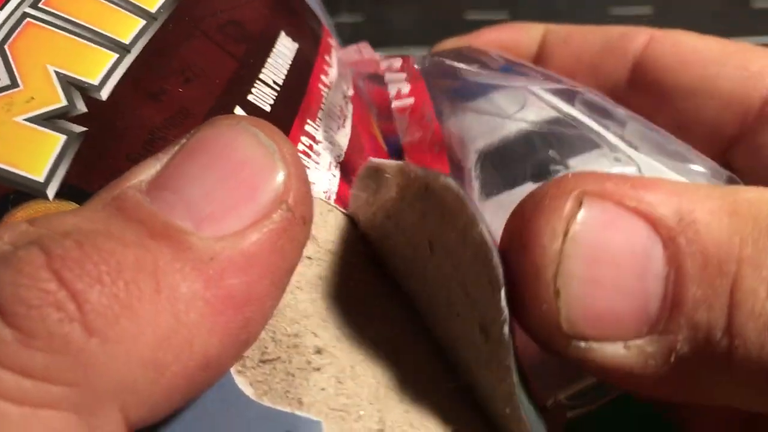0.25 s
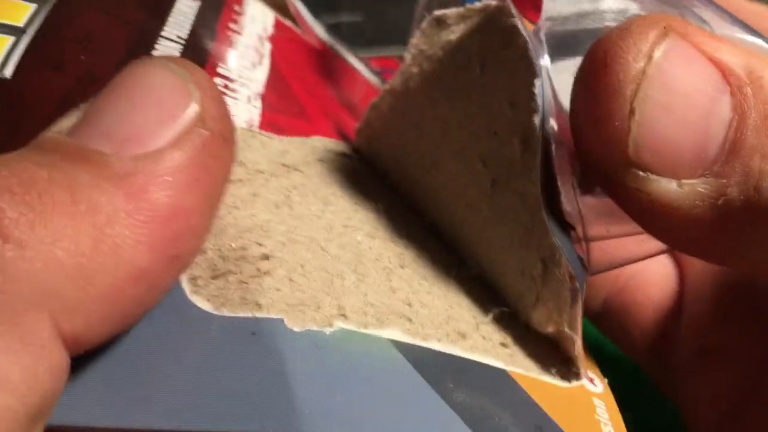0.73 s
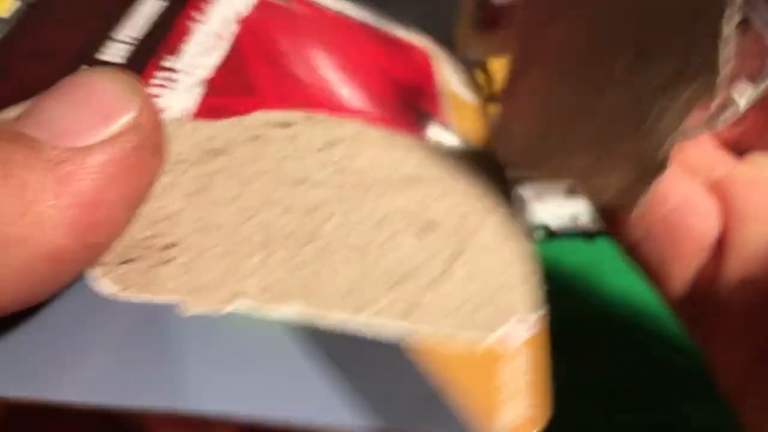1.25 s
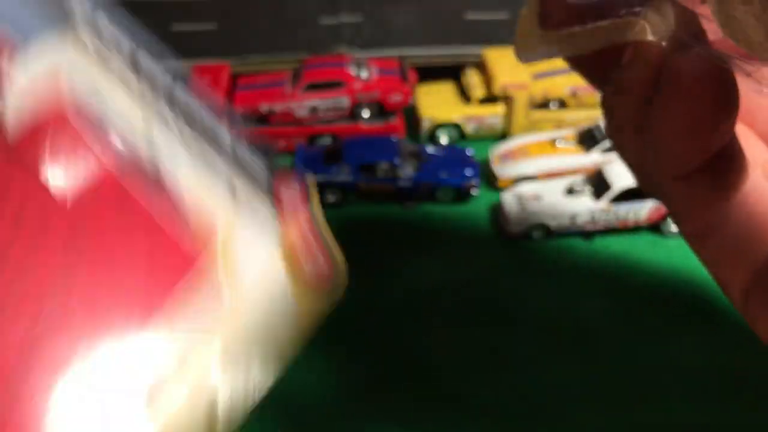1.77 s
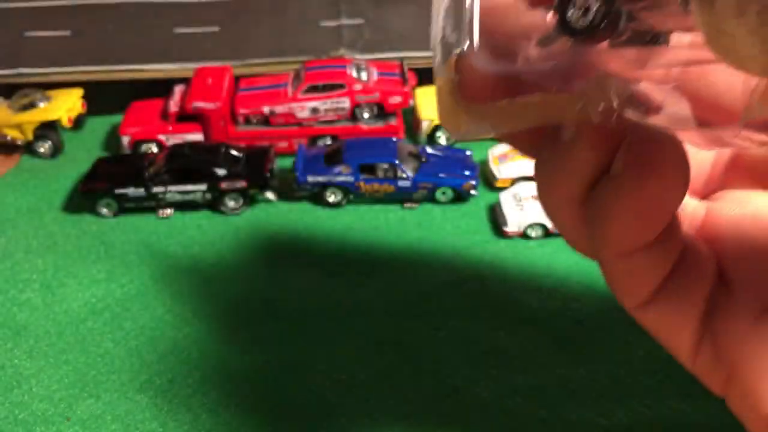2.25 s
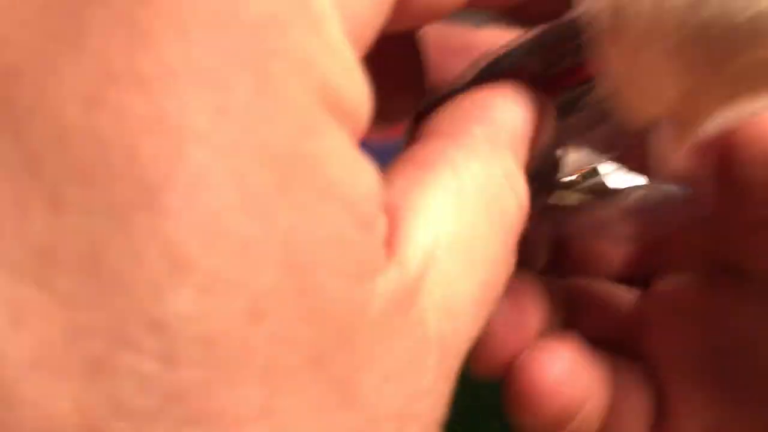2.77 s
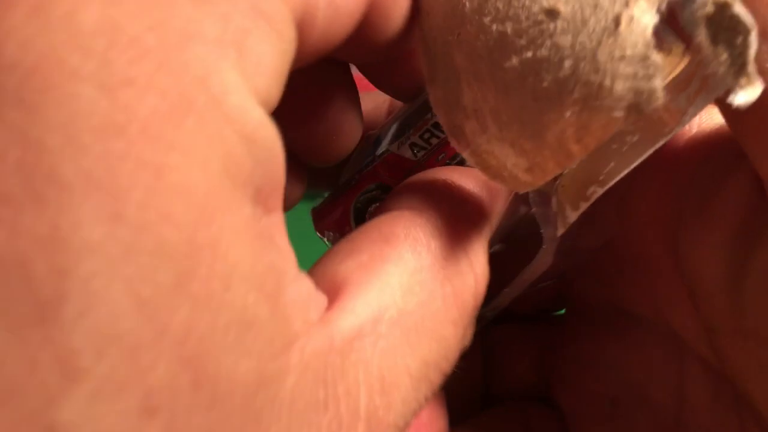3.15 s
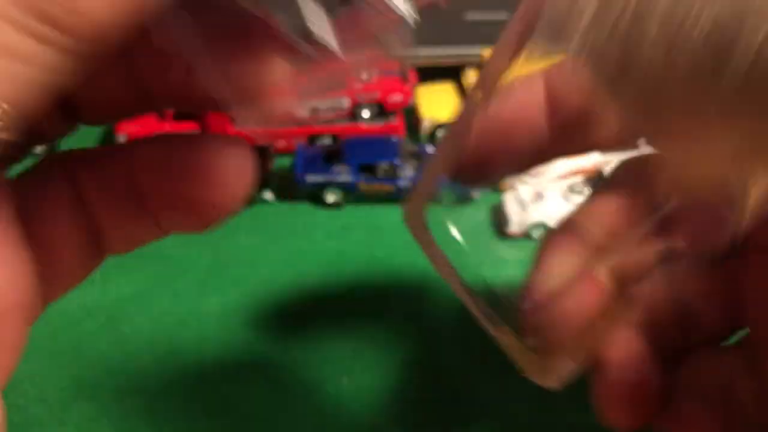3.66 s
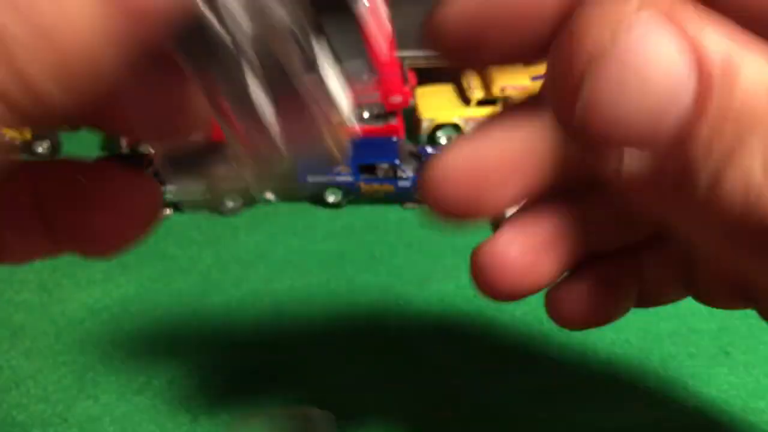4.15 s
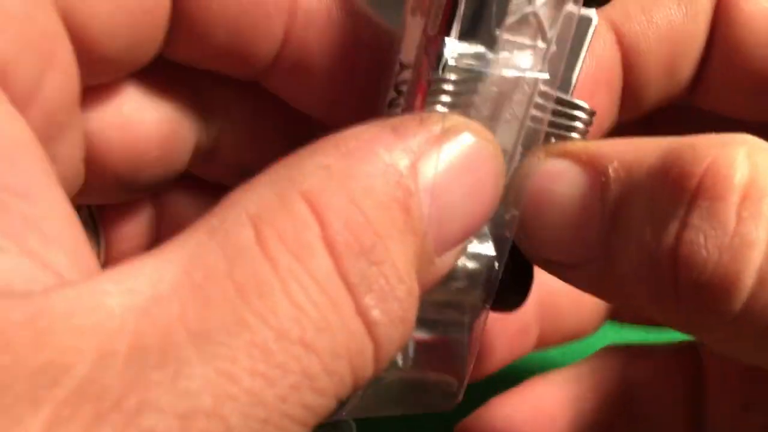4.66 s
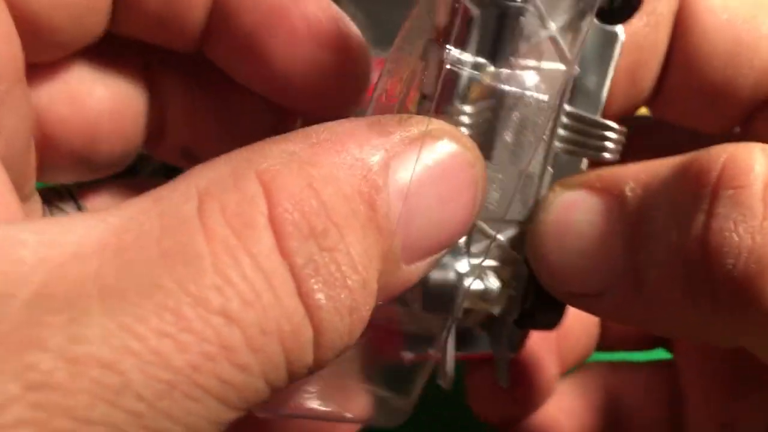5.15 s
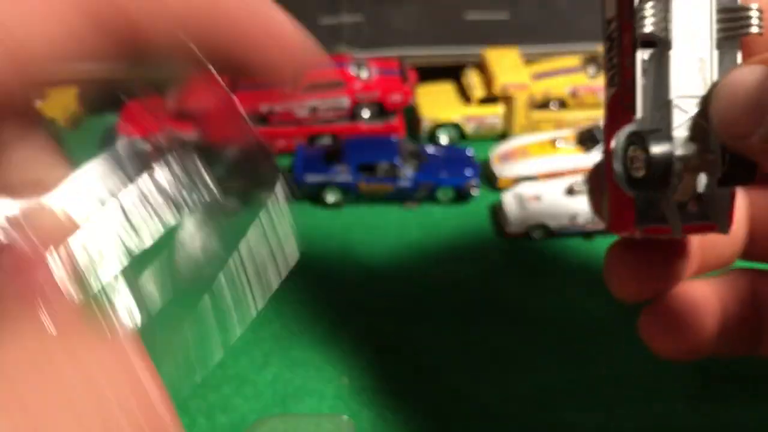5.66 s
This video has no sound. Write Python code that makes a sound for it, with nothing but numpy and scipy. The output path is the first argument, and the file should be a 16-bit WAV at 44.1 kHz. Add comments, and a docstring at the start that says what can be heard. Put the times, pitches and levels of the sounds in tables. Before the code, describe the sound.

Cardboard fibres rip in rough, hissy bursts, mixed with hard plastic cracks and dull thumps from the fingers. The tearing stops and light irregular crinkling continues, then the empty shell buckles sharply with brief squeaks. After that come sparse ticks, a strong click with a low knock, and a last cluster of snaps. Dry, mono, close phone pickup, short room reflection, faint air hiss.

```python
"""A clear plastic blister is torn off its cardboard card close to a phone; then shell and toy are handled.
Buckling plastic: short noise bursts ring panel modes. Tearing fibres and finger rub: noise gated by random
breaks, plus tiny damped cycles. Pushes: low damped sines. Dragging fingers: narrow gliding tones.
A small room answers with decaying noise over faint air noise.
"""
import sys
import numpy as np
from scipy import signal
from scipy.fft import rfft, irfft, next_fast_len
from scipy.io import wavfile
from scipy.ndimage import uniform_filter1d

SR = 44100
rng = np.random.default_rng(int(sys.argv[2]) if len(sys.argv) > 2 else 0)


def to_wav(s):
    """Save 16-bit WAV."""
    ch = np.atleast_2d(s).T  # columns
    pcm = np.round(np.clip(ch, -1, 1) * 32767)  # PCM
    wavfile.write(sys.argv[1], SR, pcm.astype(np.int16))


N = 260340
SPAN = 4096  # samples: filter padding and unit of event lengths


def amp(db):
    """Amplitude factor of a level in dB."""
    return 10 ** (np.asarray(db) / 20)


def unit(x):
    """Scale to RMS 1."""
    return x / np.sqrt(np.mean(x ** 2, axis=-1, keepdims=True) + 1e-20)


def along(points, hz):
    """Interpolate (Hz, value) points on a log frequency axis."""
    point_hz, value = np.transpose(points)
    return np.interp(np.log(hz + 1), np.log(point_hz + 1), value)


def filtered(x, response):
    """Multiply the spectrum of x by a complex response of frequency."""
    size = next_fast_len(x.shape[-1] + SPAN)
    spectrum = rfft(x, size) * response(np.fft.rfftfreq(size, 1 / SR))
    return irfft(spectrum, size)[..., :x.shape[-1]]


def colour(points):
    """Response through (Hz, dB) points."""
    return lambda hz: amp(along(points, hz))


def mode(hz, centre_hz, width_hz):
    """Resonance of one damped mode, 1 at its centre."""
    return 1j * hz * width_hz / (centre_hz ** 2 - hz ** 2 + 1j * hz * width_hz)


def place(rows, start_s):
    """Sum short sounds, each from its own start."""
    at = np.round(start_s * SR).astype(int)[:, None] + np.arange(rows.shape[1])
    return np.bincount(at.ravel(), rows.ravel(), N)[:N]


# blister and card modes: centre_hz [Hz], width_hz [Hz], level_db [dB]
SHELL = [(624, 134, -5.5), (997, 350, -4), (1450, 220, -6.5), (1756, 89, -3.5), (2318, 480, -8),
         (3490, 1050, -14)]


def shell(hz):
    """Fixed modes of blister and card, summed with alternating sign."""
    modes = [amp(level_db) * mode(hz, centre_hz, width_hz) for centre_hz, width_hz, level_db in SHELL]
    return sum((-1) ** k * m for k, m in enumerate(modes))


# tugs that rip fibres and finger strokes: peak_s [s], rise_ms [ms], fall_ms [ms, before the shares below],
# card rustle_db [dB], fibre hiss_db [dB], bent panel_hz [Hz]
TUGS = [(.13, 27, 53, -54, -26.5, 1200), (0.186, 13, 58, -43, -21, 2400), (.215, 27, 79, -44, -30.5, 2440),
        (.317, 40, 85, -33, -27, 1070), (.418, 3.7, 34, -19.5, -24, 880), (0.439, 16, 25, -38, -19, 900),
        (.487, 12, 33, -21.5, -19, 780), (0.58, 15, 48, -23.5, -28.5, 824),
        (.625, 16, 57, -32.5, -35, 1150), (.89, 41, 120, -41.5, -35.5, 2540),
        (0.996, 26, 50, -57, -21, 1900), (1.055, 24.6, 40, -19, -23, 970), (1.201, 17, 23, -25, -33, 2110),
        (1.271, 32, 66, -58, -25, 2740), (1.37, 43, 91, -23.5, -39, 860), (1.55, 15, 120, -46.5, -47, 1840),
        (1.864, 13, 100, -32, -45, 1420), (2.067, 11, 97, -36.5, -62, 990),
        (2.189, 13, 67, -38.5, -41.5, 1460), (2.273, 9.3, 80, -37.5, -70, 1560),
        (2.405, 28, 42, -44, -65, 1720), (2.662, 6.2, 22, -34.5, -69, 1500),
        (2.711, 7.7, 21, -36.5, -71, 1590), (2.791, 2, 21, -28, -43, 1510),
        (2.891, 52, 68, -32, -40.5, 3150), (3.051, 10, 110, -35.5, -39, 2220),
        (3.185, 47, 75, -31.5, -46, 1190), (3.3, 7.4, 42, -23, -22, 1130), (3.35, 16, 11, -29, -16, 1080),
        (3.405, 32, 46, -47, -34.5, 2900), (3.455, 37, 8.7, -45, -25.5, 1496),
        (3.558, 5, 33, -32, -66, 1420), (3.628, 7.7, 31, -25.5, -50.5, 1740),
        (4.006, 3, 45, -49.5, -54, 1400), (4.051, 6.2, 12, -42, -40, 1300), (4.08, 10, 83, -46, -55, 1380),
        (4.328, 3.6, 56, -48, -51, 2590), (4.373, 20, 58, -45, -48, 2520),
        (4.518, 2.6, 12, -12.5, -50, 1770), (4.687, 5.5, 24, -44, -59, 3070),
        (4.731, 8.9, 23, -51, -41, 1720), (5.003, 99, 97, -49.5, -45, 2740),
        (5.322, 8.8, 40, -38, -42, 3270), (5.383, 8.3, 27, -23.5, -64, 1260),
        (5.562, 11, 35, -39, -50, 1000), (5.807, 38, 52, -42.5, -47, 2720),
        (5.891, 4.2, 43, -19, -42, 1400)]
# hands holding the pack: time_s [s], card rustle_db [dB], handling rumble_db [dB]
HOLD = [(0, -37, -53), (.4, -54.5, -56), (.73, -49, -63), (1.3, -55, -54.5), (1.63, -55.5, -59.5),
        (1.84, -39.5, -38), (2.03, -47.5, -54), (2.27, -62, -48), (2.6, -55.5, -60.5), (2.72, -89, -50),
        (3.02, -62, -63), (3.29, -49, -51), (3.5, -39, -50), (3.68, -56, -62), (3.87, -63, -65),
        (4.02, -58.5, -63), (4.18, -75, -63), (4.38, -53.5, -55.5), (4.62, -55, -58.5), (4.9, -63, -62.5),
        (5.28, -53.5, -59.5), (5.5, -58.5, -60), (5.68, -52.5, -61), (5.81, -64, -54.5), (5.9, -67, -50)]
RUSTLE_FALL, HISS_FALL = 0.5, 0.66  # shares of fall_ms
RASP_DULL, RASP_DB = 0.31, -2.5  # place between hiss (0) and rustle (1), offset
HOLD_HISS_DB, TUG_RUMBLE_DB = -5.5, -23  # relative to the rustle of hold and tug


def effort():
    """Levels of rumble, rustle, rasp, hiss in dB: each tug swells and dies over the hold."""
    peak_s, rise_ms, fall_ms, rustle_db, hiss_db, _ = np.transpose(TUGS)[:, :, None]
    t = np.arange(0, N / SR + .002, .001)

    def swell(db, fade_ms):
        rise = (t - peak_s) * 1000 / rise_ms
        fade = (peak_s - t) * 1000 / fade_ms
        return np.sum(amp(db) * np.exp(np.minimum(rise, fade)), axis=0)

    time_s, hold_db, grip_db = np.transpose(HOLD)
    hold = amp(np.interp(t, time_s, hold_db))
    tug = swell(rustle_db, RUSTLE_FALL * fall_ms)
    rumble = amp(np.interp(t, time_s, grip_db)) + amp(TUG_RUMBLE_DB) * tug
    hiss = amp(HOLD_HISS_DB) * hold + swell(hiss_db, HISS_FALL * fall_ms)
    levels = [20 * np.log10(v) for v in (rumble, hold + tug, hiss)]
    rumble_db, rustle_db, hiss_db = [np.interp(np.arange(N) / SR, t, db) for db in levels]
    rasp_db = RASP_DULL * rustle_db + (1 - RASP_DULL) * hiss_db + RASP_DB
    return rumble_db, rustle_db, rasp_db, hiss_db


def grains(rate_hz, spread_db, decay_ms, steady):
    """Gate of many small random breaks of very unequal size, over a steady share."""
    happens = rng.random(N) < rate_hz / SR
    size = amp(spread_db * np.minimum(rng.exponential(size=N), 3))
    decay = np.exp(-np.arange(SPAN // 4) / (decay_ms * SR / 1000))
    return steady + unit(signal.fftconvolve(happens * size, decay)[:N])


def bending(x, peak_s, panel_hz):
    """Shell modes plus the panel bent now; one panel fades into the next."""
    hz, t, z = signal.stft(x, SR, nperseg=512)
    panels = np.abs(mode(hz[:, None], panel_hz, 0.04 * panel_hz + 120))
    bent = np.array([np.interp(t, peak_s, row) for row in panels])
    body = .5 * np.abs(shell(hz))[:, None] + 0.2 * bent
    return signal.istft(z * body / np.linalg.norm(body, axis=0), SR, nperseg=512)[1][:N]


def crackle(count):
    """Single fibres break: each a few damped cycles at its own pitch, sizes very unequal."""
    when, pitch, life, size = rng.random((count, 4)).T[:, :, None]
    hz = 1700 * amp(18 * pitch)
    t = np.arange(SPAN // 32) / SR
    level = amp(5.5 * np.minimum(-np.log(size), 3.5))
    fade = np.exp(-t * hz / (.8 + 2 * life))
    return unit(place(level * fade * np.sin(2 * np.pi * hz * t), when[:, 0] * N / SR))


# handling rumble colour: freq_hz [Hz], level_db [dB]
RUMBLE = [(20, -40.5), (50, -1), (90, -9), (200, -6), (400, -8), (800, -35)]
# rasp and snap crack colour: freq_hz [Hz], level_db [dB]
CRACK = [(2200, -9.5), (3400, -1.5), (4500, 1.5), (6200, 3.5), (8000, -1), (12000, -6.5)]
# hiss and snap sizzle colour: freq_hz [Hz], level_db [dB]
SIZZLE = [(4000, -63), (8000, -5.5), (13000, -5), (15500, -8.5), (17000, -5)]


def tearing():
    """Fibres part and fingers slide: bands of gated noise; all but the rumble share some breaks."""
    peak_s, *_, panel_hz = np.transpose(TUGS)
    rumble_db, rustle_db, rasp_db, hiss_db = effort()
    noise = rng.standard_normal((4, N))
    shared = grains(rate_hz=400, spread_db=2.5, decay_ms=3.3, steady=0.21)

    def gate(decay_ms):
        return shared + 0.25 * grains(rate_hz=440, spread_db=8.0, decay_ms=decay_ms, steady=0.22)

    slow_gate = grains(rate_hz=50, spread_db=3.5, decay_ms=7, steady=.9)
    rumble = amp(rumble_db) * unit(filtered(noise[0] * slow_gate, colour(RUMBLE)))
    rustle = amp(rustle_db) * unit(bending(noise[1] * gate(1.0), peak_s, panel_hz))
    rasp = amp(rasp_db) * unit(filtered(noise[2] * gate(1.0), colour(CRACK)))
    hiss = amp(hiss_db) * unit(filtered(noise[3] * gate(0.91), colour(SIZZLE)))
    fibres = amp((rasp_db + hiss_db) / 2 - 12.0) * crackle(count=7000)
    return fibres + rumble + rustle + rasp + hiss


# still room air colour: freq_hz [Hz], level_db [dB]
AIR = [(18, -38), (30, -3.5), (112, -8.5), (157, -30), (1760, -28), (4910, -18), (12600, -21.5),
       (14000, -15), (16000, -25.5)]


def still_air():
    """Faint steady coloured noise of the still room."""
    return amp(-64.5) * unit(filtered(rng.standard_normal(N), colour(AIR)))


# room decay: freq_hz [Hz], t60_s [s]
ROOM = [(200, 0.18), (1500, 0.24), (5000, 0.17), (14000, 0.1)]


def room(x):
    """Noise tail, each frequency dying at its own speed, after a 200-sample delay."""
    hz, t, z = signal.stft(rng.standard_normal(SR // 3), SR, nperseg=256)
    fade = amp(-60 * t / along(ROOM, hz)[:, None])
    tail = signal.istft(z * fade, SR, nperseg=256)[1]
    return signal.fftconvolve(np.pad(x, (200, 0)), tail / np.linalg.norm(tail))[:N]


SLIPS, TICKS = 14, 110  # counts
# a seam lets go in a quick, nearly even run of slips
SLIP_S, SLIP_GAP_S, SLIP_JITTER_S = 3.0625, .00553, .0005
SLIP_MS, SLIP_HZ, SLIP_DB = 1.6, 1300, (-32.5, -37, -28)  # dB: ring, crack, sizzle
TICK_DB, TICK_SCATTER_DB = (0.5, 2.5, 3.5), 5  # ring over rustle, crack over rasp, sizzle over hiss


def small_snaps():
    """Rows in SNAPS columns: the run of slips, then random ticks that follow the effort."""
    chance = rng.standard_normal((SLIPS, 4))
    slip_s = SLIP_S + SLIP_GAP_S * np.arange(SLIPS) + SLIP_JITTER_S * chance[:, 0]
    slip_db = SLIP_DB + 2.9 * chance[:, 1:]
    run = np.column_stack([slip_s, np.full(SLIPS, SLIP_MS), np.full(SLIPS, SLIP_HZ), slip_db])
    when, length, pitch = rng.random((TICKS, 3)).T
    effort_db = np.transpose(effort()[1:])[(when * N).astype(int)]
    tick_db = effort_db + TICK_DB + rng.normal(0, TICK_SCATTER_DB, (TICKS, 3))
    ticks = np.column_stack([when * N / SR, 0.8 + 2.1 * length, 900 * 4 ** pitch, tick_db])
    return np.vstack([run, ticks])


def peak_at(rows, level_db):
    """Scale each row so that the RMS of its loudest 48 samples has this level."""
    top = np.abs(uniform_filter1d(rows ** 2, size=48)).max(axis=1, keepdims=True)
    return rows * amp(level_db) / np.sqrt(top)


# buckling snaps: start_s [s], length_ms [ms, stretched per band], panel_hz [Hz],
# panel ring_db [dB], crack_db [dB], sizzle_db [dB]
SNAPS = [(0.0293, 0.28, 1250, -30, -22, -12), (0.0436, 8.8, 605, -26.5, -28, -27),
         (0.1324, 2.1, 1010, -17.5, -16, -32), (0.207, 0.52, 3750, -37, -24, -13),
         (0.2125, 1.4, 2390, -68, -34, -9), (0.229, 0.48, 2870, -35, -16, -18),
         (0.2904, 1.3, 2570, -10, -16, -20), (0.304, 2.5, 3230, -34, -14.5, -18),
         (0.3211, 2.2, 543, -23, -29, -22), (0.3437, 0.86, 2820, -6.5, -11.5, -31),
         (0.3484, 3.4, 590, -21, -19, -18), (0.4143, 4.3, 2420, -14, -24, -23),
         (0.4787, 5.7, 1050, -14.5, -20, -19), (0.5174, 0.88, 1130, -37, -39, -12),
         (0.5719, 9, 830, -4.5, -14.5, -14), (0.6214, 3.3, 1000, -30, -15.5, -12.5),
         (0.628, 6.3, 2810, -22, -18, -32), (0.6744, 4.5, 1510, -33, -26, -22),
         (0.692, 2.1, 895, -25, -30, -30), (0.7493, 1.15, 1330, -27.5, -26, -32),
         (0.7688, 0.88, 2830, -27.5, -28, -25), (0.7809, 1.2, 1050, -30.5, -34, -42),
         (0.805, 3.8, 1490, -29.5, -37, -50), (0.8446, 3.6, 1360, -27, -32, -41),
         (0.8616, 6.8, 955, -18.5, -25, -20.5), (0.887, 2.5, 1840, -28, -45, -22),
         (0.968, 0.46, 3580, -29, -12, -10.5), (0.9851, 0.32, 3060, -35, -27, -15),
         (1.0277, 9.3, 3040, -19.5, -29, -15), (1.0387, 1.4, 3570, -12, -16, -16),
         (1.056, 0.96, 1920, -16.5, -9, -23), (1.0603, 5, 1393, -10.5, -10, -8.5),
         (1.1371, 1.8, 2750, -23, -28, -22), (1.1946, 6.8, 2050, -44, -31, -15),
         (1.201, 3.9, 1310, -13, -12.5, -4), (1.2208, 1.4, 2660, -19, -26, -21),
         (1.2595, 3.9, 2570, -23, -35, -31), (1.2754, 5.7, 1290, -29, -34, -25),
         (1.2852, 1.3, 3300, -23, -19.5, -26), (1.321, 5.7, 1270, -25, -30, -16),
         (1.371, 6.4, 900, -19, -24, -13), (1.4015, 7.4, 1765, -6.5, -12, -30),
         (1.4945, 1.1, 2440, -32, -28, -40), (1.5201, 0.78, 1710, -30, -18, -25),
         (1.5308, 1.74, 1890, -21, -37, -10.5), (1.5538, 0.75, 3630, -28.5, -23, -19),
         (1.5715, 2.5, 1770, -26, -26, -26), (1.6419, 3, 1260, -35, -18.5, -22.5),
         (1.6965, 0.78, 1870, -20.5, -20, -23), (1.7, 0.35, 3420, -33, -15.5, -18),
         (1.7283, 2.5, 3520, -22, -27, -25), (1.8104, 2.2, 3560, -51, -32, -46),
         (1.8632, 13, 3100, -23.5, -29.5, -34), (1.874, 3.6, 970, -25, -23, -29),
         (1.9228, 2.6, 1840, -21.5, -31, -28), (1.9865, 5.4, 1840, -20.5, -26, -33),
         (2.0485, 3.5, 1840, -20.5, -27.5, -25), (2.06, 1.9, 940, -19, -44, -48),
         (2.0753, 2.8, 1900, -25, -24, -27), (2.0932, 4.8, 1800, -20.5, -33, -25),
         (2.112, 1, 2020, -28, -28, -38), (2.1309, 1.7, 1770, -20.5, -34, -23.5),
         (2.1804, 0.82, 1870, -21, -32, -20), (2.2296, 1.1, 1260, -23.5, -28, -22),
         (2.2623, 4.4, 1550, -23.5, -32, -38), (2.2722, 8.8, 1670, -19.5, -29.5, -27),
         (2.3094, 1.2, 2070, -29, -32, -25), (2.3204, 1.1, 2140, -31, -38, -35),
         (2.343, 2.1, 2190, -40, -43, -43), (2.3563, 3.1, 2130, -34, -37, -35),
         (2.378, 0.87, 1430, -31, -48, -58), (2.4003, 1.2, 2240, -26.5, -35, -27),
         (2.4113, 2.5, 1660, -26, -52, -48), (2.431, 0.46, 1730, -23.5, -25.5, -17),
         (2.4823, 5.2, 3460, -34.5, -61, -53), (2.515, 2.2, 1550, -32, -35, -27.5),
         (2.5613, 0.59, 1240, -27, -37.5, -40), (2.6117, 4.3, 1110, -29.5, -38.5, -49),
         (2.653, 0.39, 1740, -5.5, -30, -31), (2.699, 22, 1590, -32, -50, -34),
         (2.7035, 1.5, 940, -23, -31, -41), (2.7084, 5.5, 3420, -27, -31, -28),
         (2.7845, 6.9, 1640, -27, -27.5, -31), (2.8159, 3.7, 1720, -46, -23.5, -19),
         (2.882, 1.4, 1730, -10.5, -10, -8.5), (2.8926, 0.87, 3300, -18.5, -27, -32),
         (2.9321, 5, 2390, -8.5, -11, -14), (2.9564, 2.2, 1430, -25, -33, -18),
         (2.9718, 1.5, 720, -22.5, -32, -24), (2.9824, 1.56, 1080, -21.5, -18.5, -10),
         (3.003, 1.1, 570, -34, -40, -44), (3.018, 1.5, 1720, -32, -41, -42),
         (3.028, 3.4, 3260, -28.5, -30, -26), (3.0432, 3.1, 1500, -30, -30, -24),
         (3.048, 3.6, 690, -26, -30, -26), (3.1453, 3.3, 2500, -12, -14.5, -8.5),
         (3.173, 1.7, 2260, -25, -18.5, -6.5), (3.178, 1.7, 1000, -17.5, -27, -37),
         (3.1868, 0.36, 1000, -24, -21, -36), (3.2078, 2.4, 1060, -22.5, -26, -25),
         (3.2205, 0.86, 2220, -25, -29, -25), (3.245, 1.1, 980, -18.5, -22, -24),
         (3.2628, 0.89, 1030, -12.5, -20, -22), (3.287, 0.89, 1130, -23, -23, -12),
         (3.2931, 16, 1660, -24.5, -18, -26), (3.2986, 1.5, 1120, -21.5, -25, -7),
         (3.308, 0.52, 2430, -19.5, -20, -4.5), (3.3255, 1.1, 2250, -21, -8.5, -4),
         (3.3432, 5.4, 1250, -16.5, -19, -25), (3.3558, 1.5, 3090, -8.5, -14.5, -14),
         (3.4412, 2.7, 1120, -7.5, -37, -15), (3.4648, 4.3, 1390, -18, -31, -23.5),
         (3.5502, 5.4, 1730, -9, -14.5, -10), (3.6109, 3.9, 1690, -6.5, -10.5, -15),
         (3.6316, 4.8, 1650, -19, -29.5, -41), (3.687, 3.2, 1870, -15.5, -12, -17.5),
         (3.8952, 1.7, 1950, -45.5, -66, -62), (4.0376, 9.4, 1565, -20, -21, -24),
         (4.0885, 9.7, 1350, -30.5, -44, -61), (4.1238, 0.87, 610, -41, -35, -46),
         (4.145, 4.2, 1400, -38, -49, -65), (4.2164, 1.9, 1960, -34.5, -29.5, -44),
         (4.2283, 5.4, 1800, -29, -46, -65), (4.2558, 2.2, 644, -35.5, -48, -53),
         (4.274, 2.2, 2710, -48, -58, -62), (4.288, 2, 2600, -49, -58, -62),
         (4.326, 2.8, 2520, -35, -35, -45), (4.3584, 7.4, 1370, -26, -33, -48),
         (4.3837, 4.4, 2510, -25.5, -28.5, -33), (4.421, 3.9, 3160, -29.5, -42, -51),
         (4.4815, 7.4, 2420, -32, -38, -39), (4.505, 0.9, 1690, -63, -27, -23),
         (4.518, 6.9, 1190, -14, -9, -20), (4.619, 1.4, 2500, -45, -46, -55),
         (4.6793, 0.79, 3370, -53, -26, -32), (4.6868, 10, 2930, -33.5, -32, -32),
         (4.7231, 3.5, 1660, -26, -23, -19), (4.7327, 3.6, 2960, -28, -27.5, -17),
         (4.7742, 1.5, 1830, -46, -39, -37), (4.8066, 0.42, 1640, -48, -22, -26),
         (4.873, 0.73, 2520, -42, -35, -51), (4.9796, 0.81, 1760, -19.5, -14, -31),
         (4.9934, 4.2, 3140, -15.5, -11.5, -26), (5.048, 3.2, 2900, -42, -48, -31),
         (5.0637, 1.4, 1410, -33.5, -50, -35), (5.1057, 1.5, 1620, -38.5, -54, -53),
         (5.163, 1.5, 2520, -45, -41, -39), (5.238, 4.1, 3050, -41.5, -32.5, -27.5),
         (5.287, 2.9, 2190, -30.5, -12, -18), (5.3091, 1, 2870, -25, -43, -47),
         (5.315, 5.5, 3140, -11.5, -8.5, -32), (5.3507, 3, 2490, -27, -11, -9.5),
         (5.3747, 5.9, 1830, -16.5, -16.5, -16.5), (5.3837, 1.4, 1520, -18.5, -44, -42),
         (5.556, 2.7, 1040, -23.5, -30.5, -54), (5.585, 2.3, 954, -28.5, -30.5, -55),
         (5.5957, 2.8, 960, -39, -40, -50), (5.665, 3.1, 2800, -46, -41, -55),
         (5.779, 1.9, 2880, -35, -48, -58), (5.8734, 4.3, 1320, -19, -24, -28),
         (5.8777, 1.4, 1880, -23, -25, -12), (5.884, 3.5, 1460, -11.5, -23, -33),
         (5.89, 7.9, 1420, -9.5, -24, -16)]


def snaps():
    """A crease jumps: a burst of slips rings the nearest panel; the treble dies first."""
    table = np.vstack([SNAPS, small_snaps()])
    start_s, length_ms, panel_hz, ring_db, crack_db, sizzle_db = table.T[:, :, None]
    t_ms = np.arange(SPAN // 2) / SR * 1000
    noise = rng.standard_normal((len(start_s), 3, SPAN // 2))
    slow = uniform_filter1d(rng.standard_normal((len(start_s), SPAN // 2)), size=36)
    lumps = amp(1.5 * unit(slow))  # slips come in lumps
    facet_hz = rng.uniform(3160, 6970, panel_hz.shape)  # each crease has its own small facet
    rise = 1 - np.exp(-(t_ms / (0.21 * length_ms + 0.029)) ** 2)

    def burst(stretch, after_db, after_ms):
        body = lumps * np.exp(-(t_ms / (stretch * length_ms)) ** 1.54)
        return rise * (body + amp(after_db) * np.exp(-t_ms / after_ms))

    def panel(hz):
        return mode(hz, panel_hz, 0.041 * panel_hz + 220) + 0.5 * shell(hz)

    def facet(hz):
        return colour(CRACK)(hz) * (.5 + mode(hz, facet_hz, 0.12 * facet_hz))

    ring = filtered(noise[:, 0] * burst(0.68, -14.0, 4.75), panel)
    crack = filtered(noise[:, 1] * burst(0.74, -24.0, 7.2), facet)
    sizzle = filtered(noise[:, 2] * burst(0.51, -21.5, 2.0), colour(SIZZLE))
    rows = peak_at(ring, ring_db) + peak_at(crack, crack_db) + peak_at(sizzle, sizzle_db)
    return place(rows, start_s[:, 0])


# pushes on card, shell and table: start_s [s], peak_db [dB], pitch_hz [Hz]
THUDS = [(0.289, -23.5, 435), (0.424, -26, 64), (0.479, -23, 140), (0.575, -23, 122), (0.861, -40, 384),
         (1.063, -32.5, 313), (1.377, -27, 107), (1.404, -17, 119), (1.419, -31, 102), (1.733, -32.5, 101),
         (1.762, -29, 88), (1.874, -33, 168), (2.06, -22.5, 77), (2.278, -29, 184), (2.653, -21.5, 302),
         (2.79, -28, 182), (2.879, -31.5, 307), (2.932, -20.5, 456), (3.297, -37, 337), (3.355, -33, 270),
         (3.441, -23.5, 206), (3.55, -21.5, 355), (3.597, -26, 287), (3.614, -31, 84.4), (3.923, -41, 135),
         (4.042, -38, 66), (4.336, -36, 130), (4.52, -13, 160), (4.686, -35.5, 255), (5.318, -33, 208),
         (5.38, -18, 97), (5.558, -22, 144), (5.783, -37, 258)]


def thuds():
    """Soft pushes: damped low cycles; the deeper, the longer, and overtones die first."""
    start_s, peak_db, pitch_hz = np.transpose(THUDS)[:, :, None]
    t = np.arange(2 * SPAN) / SR
    phase = 2 * np.pi * pitch_hz * t
    fade = amp(-60 * t / (0.017 + 4.85 / pitch_hz))
    overtones = 1.2 * np.sin(1.69 * phase) + 0.57 * np.sin(2.9 * phase)
    rows = fade * (1 - np.exp(-t / 0.002)) * (np.sin(phase) + fade * overtones)
    return place(amp(peak_db) * rows / np.abs(rows).max(axis=1, keepdims=True), start_s[:, 0])


# finger drags on taut plastic, one panel sings: start_s [s], length_s [s], first_hz [Hz], last_hz [Hz],
# level_db [dB, RMS before the envelope]
CREAKS = [(.297, .066, 562, 542, -35), (.31, .014, 1100, 1000, -29), (1.82, .18, 595, 755, -45),
          (2.94, .077, 702, 692, -37), (3.04, .182, 692, 725, -39), (3.363, .048, 1360, 1420, -38),
          (3.368, .062, 2890, 3080, -37), (3.406, .028, 6210, 6340, -42), (3.452, .014, 13220, 13240, -35),
          (3.483, .058, 2790, 2890, -39), (3.498, .038, 4490, 4470, -50), (3.506, .038, 1710, 1630, -43),
          (4.046, .021, 1440, 1405, -26), (4.085, .015, 1405, 1385, -33), (4.09, .055, 760, 620, -44),
          (4.512, .012, 1505, 1550, -21), (5.706, .031, 992, 988, -47), (5.782, .029, 785, 690, -45)]


def creaks():
    """Stick-slip keeps a narrow, wavering tone alive while the finger moves."""
    start_s, length_s, first_hz, last_hz, level_db = np.transpose(CREAKS)[:, :, None]
    progress = np.clip(np.arange(2 * SPAN) / SR / length_s, 0, 1)
    wander = uniform_filter1d(rng.standard_normal((len(start_s), 2, 2 * SPAN)), size=115)
    glide_hz = first_hz + (last_hz - first_hz) * progress
    carrier = np.exp(2j * np.pi * np.cumsum(glide_hz, axis=1) / SR)
    tone = unit(np.real((wander[:, 0] + 1j * wander[:, 1] + 0.09) * carrier))
    envelope = np.abs(np.sin(np.pi * progress)) ** 0.64
    return place(amp(level_db) * envelope * tone, start_s[:, 0])


def scene():
    """Hands, their room answer and still air, as one channel."""
    hands = snaps() + thuds() + creaks() + tearing()
    still = still_air()
    return (hands + amp(-19) * room(hands) + still)[None]


# cancellations near the microphone: centre_hz [Hz], width_hz [Hz], depth [0-1]
DIPS = [(860, 260, 0.31), (4890, 295, 0.54), (10500, 410, 0.7)]
TOP_HZ = 16000


def record(dry):
    """Phone: thins deep bass, dips narrow bands, rounds high peaks, cuts steeply above TOP_HZ."""
    def pickup(hz):
        bass_cut = (1j * hz / (55 + 1j * hz)) ** 2
        dips = [1 - depth * mode(hz, centre_hz, width_hz) for centre_hz, width_hz, depth in DIPS]
        return bass_cut * np.prod(dips, axis=0)

    def band_limit(hz):
        return amp(np.interp(hz, [TOP_HZ - 200, TOP_HZ, TOP_HZ + 800, TOP_HZ + 900], [0, -20, -26, -90]))

    thin = filtered(dry, pickup)
    rounded = thin / (1 + np.abs(thin / .98) ** 6) ** (1 / 6)
    return filtered(rounded, band_limit)


dry = scene()
out = record(dry)
to_wav(out)
```